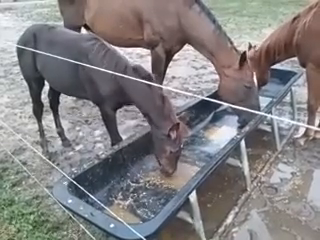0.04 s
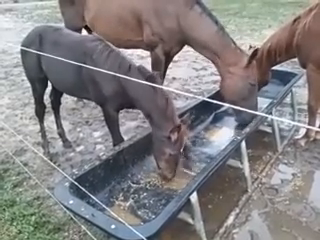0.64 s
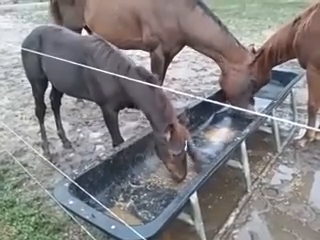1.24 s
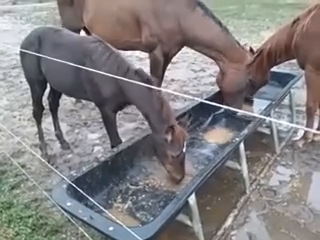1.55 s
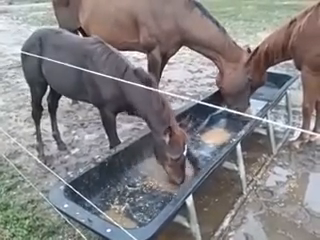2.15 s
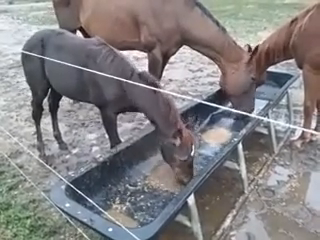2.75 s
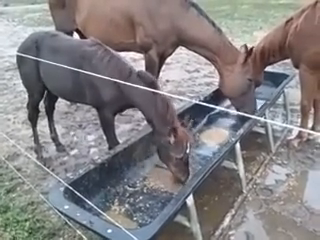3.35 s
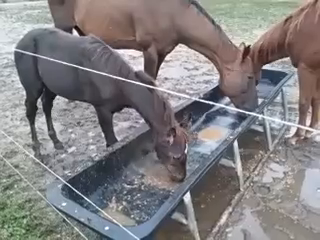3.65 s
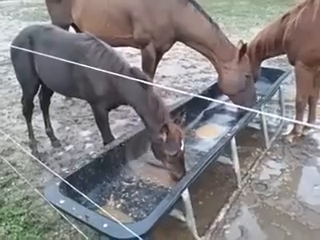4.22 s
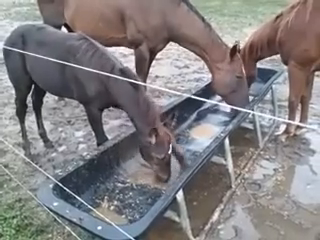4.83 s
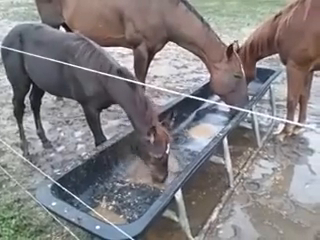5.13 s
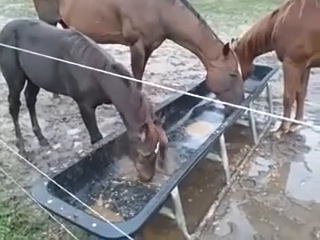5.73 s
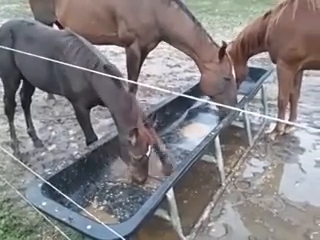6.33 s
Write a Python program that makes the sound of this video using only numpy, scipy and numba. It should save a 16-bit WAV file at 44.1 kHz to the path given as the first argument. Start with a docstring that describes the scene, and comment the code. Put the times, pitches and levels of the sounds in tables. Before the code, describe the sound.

Steady hollow knocks boom from a plastic trough as a horse's hoof strikes it and drags through wet feed outdoors.

```python
"""Hollow thunks and gritty scrapes, about two a second: a horse paws in a long plastic feed trough.
Each stroke lands toe then heel, drags through wet feed and knocks against the walls. The impacts
excite the modes of the panels and the shell, which boom and ring on; stick-slip friction drives the
scrape, grains fracture and bubbles resonate in the feed. Far off in the open yard a small bird
chirps over a steady hush of air."""
import sys
import numpy as np
from scipy import signal
from scipy.fft import rfft, irfft
from scipy.io import wavfile
from scipy.ndimage import uniform_filter1d
from numba import njit

SR = 44100
rng = np.random.default_rng(int(sys.argv[2]) if len(sys.argv) > 2 else 0)


def digitize_waveform(pressure):
    """Quantize a signal to 16-bit integers and store it at the path in sys.argv[1].

    Rows of a 2-D input are taken as channels; values are limited to [-1, 1].
    """
    field = np.atleast_2d(pressure).T
    bounded = np.clip(field, -1, 1)
    quanta = np.round(bounded * 32767).astype(np.int16)
    wavfile.write(sys.argv[1], SR, quanta)


N = 290178
TIME = np.arange(N) / SR

# Levels in the tables are relative; each source adds its own gain.
# hoof landings: t/s, thunk/dB, boom/dB, clack/dB, crack/dB, floor f/Hz, bass tilt/(dB/octave), heel/dB
HOOF_LANDINGS = [(0.0, 1, -17.5, -15, -35, 783, -5, -24), (0.26, -5, -26, -16.5, -31.5, 755, 0, -13),
                 (0.844, -2.5, -20.5, -17, -37.5, 555, 5, -15.5),
                 (1.412, -8, -17.5, -14.5, -33.5, 660, 6, -14),
                 (1.861, -20, -18, -16, -33.5, 845, 17.5, -11.5),
                 (2.275, -17, -15.5, -15.5, -34, 656, 5, -9.5), (2.719, 4, -16, -11.5, -33, 790, 0.5, -10),
                 (3.181, 6, -21, -12, -35, 669, 1, -9), (3.644, 8, -20, -12.5, -31, 622, 8, -8),
                 (4.071, -21, -17.5, -14, -35, 845, 3, -9.5), (4.494, 1, -16, -16, -33, 520, 13, -11),
                 (4.961, -28, -17, -18.5, -37, 710, 3.5, -4), (5.446, 2.5, -21, -14, -31.5, 601, 8.5, -8.5),
                 (5.925, -6, -14.5, -14, -30.5, 760, 0.5, -7.5),
                 (6.496, -20, -19, -15.5, -35.5, 805, 1, -12.5)]
# knocks on walls and frame: t/s, level/dB, boom/dB, crack/dB, struck spot f/Hz
WALL_KNOCKS = [(0.029, -10, -32, -30, 970), (0.31, -13.5, -28, -26, 1800), (0.533, -16, -25, -49, 920),
               (0.905, -1.5, -33, -19, 1770), (1.206, -15, -24.5, -37, 1200), (1.567, -2.5, -27, -19, 1340),
               (1.601, 4.5, -8, -19.5, 1040), (1.693, -16, -27, -28, 1820), (1.739, -14.5, -30, -34, 1240),
               (2.025, -6, -27, -22, 902), (2.059, -16, -17, -31, 1980), (2.165, -15.5, -26.5, -40, 1220),
               (2.335, -6, -11.5, -23, 1930), (2.379, -9, -22, -35, 1770), (2.43, -15, -36, -22, 1410),
               (2.596, -24.5, -60, -42, 1490), (2.786, -6, -10.5, -19, 1980), (2.828, -3.5, -27, -20, 2000),
               (2.903, -12.5, -25.5, -27, 990), (2.976, -28, -44, -44, 1470), (3.216, -6, -9, -30, 1950),
               (3.259, -12, -21, -15, 930), (3.329, -5.5, -28, -25, 1180), (3.46, -14.5, -27, -45, 1560),
               (3.535, -24.5, -42, -44, 1130), (3.715, -1, -24, -17, 1500), (3.801, -1.5, -6.5, -19.5, 885),
               (3.849, -5, -15, -28, 1680), (4.132, -2, -24, -16.5, 1060), (4.218, 4, -16, -14, 830),
               (4.554, -6.5, -34, -17.5, 1960), (4.689, -6, -20, -28, 1530), (5.007, 0, -22, -20.5, 1920),
               (5.192, -10, -17.5, -22, 1740), (5.499, 2, -20, -16.5, 1880), (5.704, -14, -21, -31.5, 1030),
               (5.775, -23, -45, -46.5, 2060), (5.865, -21.5, -39, -47.5, 1030),
               (5.981, -5, -16, -23, 1820), (6.178, -8.5, -22, -32, 920)]
# hoof drags: t/s, time to hardest push/s, length/s, swell/dB, judder/dB, scrape/dB, grit/dB, floor f/Hz
HOOF_DRAGS = [(0.013, 0.038, 0.048, 15, -16.5, -19.5, -34.5, 1130),
              (0.262, 0.19, 0.21, 3.5, -27.5, -25.5, -38.5, 1200),
              (0.528, 0.023, 0.024, 10, -32, -26.5, -37.5, 1120),
              (0.864, 0.075, 0.057, 13, -23, -22, -35, 1690), (0.96, 0.14, 0.2, 29, -25, -19, -33, 1110),
              (1.424, 0.1, 0.26, 8.5, -16.5, -13.5, -25, 1210),
              (1.871, 0.092, 0.22, 8.5, -15.5, -11.5, -24.5, 1194),
              (2.286, 0.049, .16, 8, -15.5, -13.5, -28, 1150),
              (2.742, 0.034, 0.15, -1, -20, -16.5, -31, 1200), (3.191, 0.052, .24, 12, -16, -11, -22, 1210),
              (3.657, 0.14, .2, -1, -14, -14.5, -28.5, 1160),
              (4.087, 0.065, 0.18, 12, -11.5, -11.5, -22.5, 1230),
              (4.506, .11, 0.24, 7, -16, -14, -26, 1130), (4.969, 0.12, 0.27, 5, -22.5, -16, -27.5, 1180),
              (5.455, 0.072, 0.2, 21, -17.5, -13.5, -24.5, 1120),
              (5.937, 0.1, 0.21, 18, -20, -13.5, -27, 1220), (6.504, 0.051, .09, 24, -21, -16.5, -25, 1250)]
# hard grains snapping under the hoof: t/s, level/dB
GRAIN_SNAPS = [(0.03, -32), (0.061, -36), (0.903, -46), (2.059, -33.5), (2.856, -48), (2.975, -42),
               (3.777, -34), (4.251, -36.5), (6.08, -42)]
# wet feed squeezed from under the hoof: t/s, length/s, level/dB, first f/Hz, last f/Hz
FEED_GUSHES = [(1.052, 0.036, -48, 9000, 7900), (1.075, .095, -19, 980, 1220),
               (1.945, 0.093, -23, 1050, 1460), (3.739, 0.06, -15.5, 1650, 1000),
               (3.762, 0.039, -38, 8300, 7700), (4.617, 0.04, -18, 1380, 1130),
               (5.097, 0.026, -13.5, 1630, 1350), (5.546, 0.067, -15, 1450, 1020),
               (6.01, 0.048, -42, 7800, 8100)]
# bird chirps: t/s, length/s, first f/Hz, last f/Hz, level/dB
BIRD_CHIRPS = [(1.37, .03, 3450, 3180, -70), (1.81, 0.047, 3750, 3420, -49), (2.18, 0.028, 3660, 3400, -48),
               (2.223, 0.051, 3520, 4600, -53), (2.597, 0.04, 3800, 4570, -55),
               (2.66, 0.073, 2650, 3100, -59)]
# bending modes of the whole shell: f/Hz, bandwidth/Hz, level/dB
BENDING_MODES = [(74, 105, -23.5), (101.5, 12, -11), (114.7, 14.4, -7), (160, 41, 0), (177.4, 29.5, 2),
                 (227.3, 32.5, -2), (247.4, 10.4, 3), (279.7, 25.7, -1), (314.7, 46, -2.5), (349, 58, -4.5)]
# decay of the trough's ring: f/Hz, T60/s
TROUGH_T60 = [(60, 1), (160, 0.65), (420, 0.38), (1100, 0.36), (2900, 0.17), (8000, 0.59)]
# crowded modes of the floor and wall panels when struck: f/Hz, level/dB
STRUCK_SPECTRUM = [(250, -32), (390, -11), (520, -0.5), (700, -1.5), (950, -5.5), (1130, -7.5), (1400, -9),
                   (1900, -6.5), (2350, -15.5), (2900, -31), (4500, -47)]
# the same panels when rubbed: f/Hz, level/dB
RUBBED_SPECTRUM = [(250, -17), (390, -5), (520, 2.5), (700, 0.5), (950, -3.5), (1130, -16), (1400, -7.5),
                   (1900, -5), (2350, -11), (2900, -29), (4500, -42)]
# hard contact of horn and grain on plastic: f/Hz, level/dB
CRACK_SPECTRUM = [(1500, -33), (2500, 2.5), (2950, 0), (3400, 1.5), (3800, 8), (4500, 0), (5400, -4),
                  (6500, -16), (8000, -18), (11000, -17), (15500, -13)]
# wet feed being crushed: f/Hz, level/dB
GRIT_SPECTRUM = [(1500, -7.5), (2500, -5), (2950, -8.5), (3800, -2), (4500, -6), (5400, -13.5),
                 (6500, -16.5), (8000, -17), (15500, -31)]
# fine spatter of droplets and crumbs: f/Hz, level/dB
SPRAY_SPECTRUM = [(6500, -13), (8200, -3.5), (10500, -4.5), (13000, -1), (15500, 9)]
# a hard grain splitting: f/Hz, level/dB
SNAP_SPECTRUM = [(1500, -20), (3800, 6.5), (6000, -3.5), (9000, -4), (15500, -3.5)]
# open-air background: f/Hz, level/dB
AIR_SPECTRUM = [(18, -62), (30, -41), (118, 14), (374, -13.5), (866, -26), (1070, -11), (1160, -15.5),
                (1760, -21), (2170, -19), (2980, -48), (3770, -45), (5590, -30), (7090, -15.5),
                (7670, -24.5), (16000, -23)]


def landings():
    """Impact excitation: the hoof drops, the floor thunks, panels clack and the shell booms."""
    out, crack = np.zeros(N), colour(CRACK_SPECTRUM)
    for s, thunk_db, boom_db, clack_db, crack_db, hz, tilt_db, _ in HOOF_LANDINGS:
        add(out, s, struck_spot(hz, thunk_db - 6, t60=0.03, detune=0.283))
        add(out, s, blow(shell(vary_db=5.1, tilt_db=tilt_db), boom_db - 1, rattle_s=0.026, snap=1.28))
        panel = colour(STRUCK_SPECTRUM, hz, focus_db=4.5)
        add(out, s, blow(panel, clack_db - 3, rattle_s=0.023, snap=0.095))
        add(out, s, blow(crack, crack_db - 4, rattle_s=0.013, snap=0.036))
    return out


def knocks(heel_delay_s=0.0225, heel_hz=1700, tick_hz=3900):
    """Brief, hard impacts: the heel and the blows on walls and frame each excite a local resonance."""
    out = np.zeros(N)
    heels = [(s + heel_delay_s, db, db - 3.5, db - 16, heel_hz * rng.uniform(.85, 1.7))
             for s, *_, db in HOOF_LANDINGS]
    for s, db, boom_db, crack_db, hz in heels + WALL_KNOCKS:
        panel = colour(STRUCK_SPECTRUM, hz, focus_db=5.5, octaves=0.39)
        crack = colour(CRACK_SPECTRUM, tick_hz * rng.uniform(0.77, 1.32), focus_db=7, octaves=0.05)
        add(out, s, struck_spot(hz, db - 11, t60=0.022, detune=0.123))
        add(out, s, blow(shell(vary_db=1.22), boom_db - 7, rattle_s=0.0056, snap=2.1))
        add(out, s, blow(panel, db - 19.5, rattle_s=0.011, snap=0.096))
        add(out, s, blow(crack, crack_db - 11.5, rattle_s=0.0064, snap=0.15))
    return out


def struck_spot(hz, db, t60, detune, size=4096):
    """Beating: two close, damped modes of one spot build up in about a cycle and interfere."""
    t = TIME[:size]
    pair = np.sin(2 * np.pi * hz * t) + .5 * np.sin(2 * np.pi * hz * (1 + detune) * t)
    return from_db(db - 60 * t / t60) * (1 - np.exp(-hz * t)) * pair


def shell(vary_db, tilt_db=0, size=8192):
    """Modal superposition: each contact weights the modes anew; a heavy one favours the lowest."""
    t, out = TIME[:size], 0
    for k, (hz, width_hz, db) in enumerate(BENDING_MODES):
        strength = from_db(db + vary_db * rng.standard_normal() - tilt_db * np.log2(hz)) * (-1) ** k
        out = out + strength * width_hz * np.exp(-np.pi * width_hz * t) * np.sin(2 * np.pi * hz * t)
    return unit_energy(out)


def blow(response, db, rattle_s, snap, size=8192, window_size=1323):
    """Forced response to an impulse and its dying reflections; db is the rms of the first 30 ms."""
    force = unit_energy(rng.standard_normal(size) * np.exp(-TIME[:size] / rattle_s))
    force[0] += snap
    sound = signal.fftconvolve(force, response)
    return from_db(db) * sound / np.sqrt(np.mean(sound[:window_size] ** 2))


def drags(rise_s=.012, lift_db_per_s=255, settle_db_per_s=84, judder_db_per_s=8.5, glide_oct_per_s=-.33):
    """Stick-slip friction: the hoof stutters along, shaking the shell, rubbing floor, crushing feed."""
    judder_gain, scrape_gain, grit_gain, floor_hz = np.zeros((4, N))
    for s, push_s, length_s, swell_db, judder_db, scrape_db, grit_db, hz in HOOF_DRAGS:
        span = slice(max(int((s - rise_s) * SR), 0), int(s * SR) + SR)
        t = TIME[span] - s
        lifted_s = np.maximum(t - length_s, 0)
        # the hoof leaves quickly, but loose feed keeps sliding
        release_db = np.maximum(-lift_db_per_s * lifted_s, -19 - settle_db_per_s * lifted_s)
        touch = np.clip(1 + t / rise_s, 0, 1) * from_db(release_db)
        push_db = stroke(t, push_s, length_s, swell_db, ease_db_per_s=80.5)
        crush_db = stroke(t, push_s, length_s, swell_db, ease_db_per_s=89.5)   # the feed is used up
        judder_gain[span] += touch * from_db(judder_db + 0.15 * push_db - judder_db_per_s * t)
        scrape_gain[span] += touch * from_db(scrape_db + push_db)
        grit_gain[span] += touch * from_db(grit_db + crush_db)
        floor_hz[span] = hz * 2 ** (glide_oct_per_s * (np.minimum(t, length_s) - push_s))
    jolts = slips(per_s=900, spread_db=1.5)
    judder = judder_gain * from_db(-4.5) * evened(through(jolts, shell(vary_db=0)), 0.018)
    rubbing = scrape(jolts, scrape_gain, floor_hz)
    catch = drift(.008)   # the hoof catches and lets go, so scrape and grit come in clumps
    return judder + rubbing * from_db(1.4 * catch) + grit_gain * crunch() * from_db(2.4 * catch)


def stroke(t, push_s, length_s, swell_db, ease_db_per_s):
    """Contact-force envelope in dB: it swells to the hardest push, then eases until the hoof lifts."""
    to_come = np.clip(1 - t / push_s, 0, 1)
    easing_s = np.maximum(np.minimum(t, length_s) - push_s, 0)
    return -swell_db * to_come - ease_db_per_s * easing_s


def scrape(jolts, gain, floor_hz, bite_db=-22):
    """Friction-driven resonance: the harder the hoof bites, the more floor tone replaces squelch."""
    panel = colour(RUBBED_SPECTRUM)
    squelch = evened(through(pings(jolts, 401.5, 3230, cycles=28), panel), 0.035)
    floor = evened(moving_resonance(through(jolts, panel), floor_hz, width_hz=260), 0.063)
    bite = gain / (gain + from_db(bite_db))
    return gain * (from_db(-3.5 - 4 * bite) * squelch + from_db(-12.5 + 7.65 * bite) * floor)


def ring(x, low_db=-9, high_db=-13, lumpy_db=7, size=40000, bands=10):
    """Reverberation: bending waves run along the trough and return unevenly; the lowest last longest."""
    t, response = TIME[:size], np.zeros(size)
    edges = np.geomspace(40, 17000, bands + 1)
    returns = np.minimum(t / 0.0057, 1) * from_db(lumpy_db * drift(0.0089)[:size])
    for low, high, db in zip(edges, edges[1:], np.linspace(low_db, high_db, bands)):
        fade = from_db(-60 * t / at_hz(TROUGH_T60, np.sqrt(low * high)))
        waves = unit_energy(rng.standard_normal(size) * fade * returns)
        band = signal.butter(2, [low, high], "band", fs=SR, output="sos")
        response += from_db(db) * signal.sosfilt(band, waves)
    return through(x, response)


def crunch(spray_patchy_db=4):
    """Granular fracture: large grains crack over fine ones; droplets and crumbs spatter in bursts."""
    grit = colour(GRIT_SPECTRUM)
    fine = evened(through(slips(per_s=6500, spread_db=2), grit), 0.17)
    grains = pings(slips(per_s=650, spread_db=3.5), 2200, 6000, cycles=24)
    coarse = evened(through(grains, grit), 0.16)
    droplets = pings(slips(per_s=2400, spread_db=2.5), 6900, 14400, cycles=22)
    spray = evened(through(droplets, colour(SPRAY_SPECTRUM)), 0.04)
    spray_db = -15.5 + spray_patchy_db * drift(0.02)
    return from_db(-5) * fine + from_db(-7) * coarse + from_db(spray_db) * spray


def gushes(width_at_1khz=520):
    """Cavity resonance: tiny bubbles sound through the gap under the hoof, gliding as it changes size."""
    out = np.zeros(N)
    for s, length_s, db, first_hz, last_hz in FEED_GUSHES:
        hz = np.linspace(first_hz, last_hz, int(length_s * SR))
        bubbles = slips(per_s=4000, spread_db=2.5)[:len(hz)]
        for _ in range(2):
            bubbles = moving_resonance(bubbles, hz, width_at_1khz * np.sqrt(first_hz / 1000))
        add(out, s, from_db(db) * np.hanning(len(hz)) * bubbles / bubbles.std())
    return out


def snaps():
    """Brittle fracture: now and then a hard grain splits with a bright crack."""
    out = np.zeros(N)
    for s, db in GRAIN_SNAPS:
        add(out, s, blow(colour(SNAP_SPECTRUM), db, rattle_s=0.0056, snap=.15))
    return out


def drips(per_s=6, mean_db=-46, median_hz=1400, cycles=45, rise=.15, size=4096):
    """Bubble resonance: each drop falling into the feed traps air that rings briefly, rising in pitch."""
    out, t = np.zeros(N), TIME[:size]
    for s in TIME[rng.random(N) < per_s / SR]:
        hz = median_hz * 2 ** (.5 * rng.standard_normal())
        age = hz * t / cycles
        envelope = from_db(mean_db + 3 * rng.standard_normal() - 60 * age)
        add(out, s, envelope * np.sin(2 * np.pi * hz * t * (1 + rise * age)))
    return out


def nibbling():
    """Micro-impacts: muzzles push wet feed about, a faint rustle of ticks heard between the strokes."""
    ticks = pings(slips(per_s=400, spread_db=3), 510, 6200, cycles=18)
    plastic = colour(RUBBED_SPECTRUM) + from_db(-5) * colour(CRACK_SPECTRUM)
    rustle = through(ticks, blow(plastic, 0, rattle_s=0.011, snap=0.35))
    return from_db(-60.5) * evened(rustle, .06)


def bird():
    """Frequency modulation: each faint whistle is a pure tone in a linear glide."""
    out = np.zeros(N)
    for s, length_s, first_hz, last_hz, db in BIRD_CHIRPS:
        hz = np.linspace(first_hz, last_hz, int(length_s * SR))
        add(out, s, from_db(db) * np.hanning(len(hz)) * np.sin(2 * np.pi * np.cumsum(hz) / SR))
    return out


def yard_air(db=-51):
    """Stationary coloured noise: the distant air of the yard."""
    return from_db(db) * through(rng.standard_normal(N), colour(AIR_SPECTRUM))


def slips(per_s, spread_db):
    """Poisson process: tiny jolts of uneven size, as in friction or crushing."""
    sizes = from_db(spread_db * np.minimum(rng.exponential(1, N), 4)) * rng.choice([-1, 1], N)
    return sizes * (rng.random(N) < per_s / SR)


def pings(jolts, low_hz, high_hz, cycles, count=52):
    """Constant-Q ringing: each jolt excites one resonator, which falls 60 dB in the given cycles."""
    out, dealt = np.zeros(N), rng.integers(0, count, N)
    for k, hz in enumerate(np.geomspace(low_hz, high_hz, count)):
        r, w = from_db(-60 * hz / (cycles * SR)), 2 * np.pi * hz / SR
        force = jolts * (dealt == k) + 1e-18
        out += signal.lfilter([1 - r, 0, r - 1], [1, -2 * r * np.cos(w), r * r], force)
    return out


@njit
def moving_resonance(x, hz, width_hz):
    """Two-pole resonance with a gliding centre frequency."""
    r, w = np.exp(-np.pi * width_hz / SR), 2 * np.pi * hz / SR
    y = np.zeros(len(x))
    for i in range(2, len(x)):
        y[i] = x[i] - x[i - 2] + 2 * r * np.cos(w[i]) * y[i - 1] - r * r * y[i - 2]
    return y


def colour(spectrum, focus_hz=1000, focus_db=0, octaves=0.2, size=2048):
    """Minimum-phase impulse response of a spectrum, raised by focus_db around focus_hz."""
    hz = np.maximum(np.fft.rfftfreq(size, 1 / SR), 1)
    db = at_hz(spectrum, hz) + focus_db * np.exp(-(np.log2(hz / focus_hz) / octaves) ** 2)
    cepstrum = irfft(np.log(from_db(db)))
    cepstrum[1:size // 2] *= 2
    cepstrum[size // 2 + 1:] = 0
    return unit_energy(irfft(np.exp(rfft(cepstrum))))


def smoothed(x, seconds):
    """Low-pass filtering by two moving averages."""
    size = max(int(seconds * SR), 2)
    return uniform_filter1d(uniform_filter1d(x, size), size)


def drift(seconds):
    """Slow random fluctuation of unit variance."""
    slow = smoothed(rng.standard_normal(N), seconds)
    return slow / slow.std()


def evened(x, seconds):
    """Normalisation to a running rms of 1."""
    return x / np.sqrt(np.abs(smoothed(x * x, seconds)) + 1e-12)


def unit_energy(x):
    """Normalisation to an energy of 1."""
    return x / np.sqrt(np.sum(x ** 2) + 1e-20)


def from_db(db):
    """Amplitude ratio of a level."""
    return 10 ** (np.asarray(db) / 20)


def at_hz(points, hz):
    """Interpolation on a log-frequency axis."""
    points = np.array(points)
    return np.interp(np.log(np.maximum(hz, 1)), np.log(points[:, 0]), points[:, 1])


def through(x, response):
    """Convolution with an impulse response."""
    return signal.oaconvolve(x, response)[:N]


def add(track, s, sound):
    """Superposition of a sound on a track at time s."""
    start = int(np.clip(round(s * SR), 0, N - 1))
    track[start:start + len(sound)] += sound[:N - start]


def scene():
    """Linear superposition of the trough's direct sound, its ring, the bird and the air."""
    trough = landings() + knocks() + snaps() + drags() + gushes() + drips() + nibbling()
    return (trough + ring(trough) + bird() + yard_air())[None]


def record(dry, bass_cut_hz=56, top_cut_hz=15750):
    """Band limiting and saturation: a small microphone loses deep bass, rounds peaks and cuts the top."""
    thin = signal.sosfilt(signal.butter(4, bass_cut_hz, "high", fs=SR, output="sos"), dry)
    return signal.sosfilt(signal.ellip(10, .1, 80, top_cut_hz, fs=SR, output="sos"), np.tanh(thin))


dry = scene()
out = record(dry)
digitize_waveform(out)
```